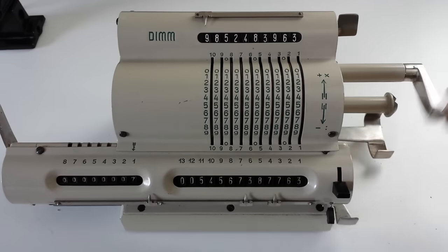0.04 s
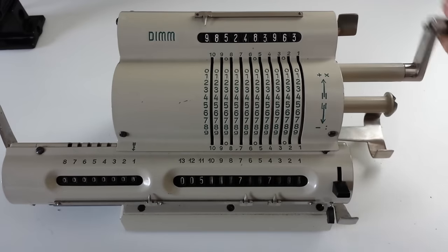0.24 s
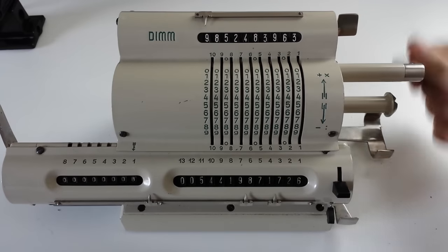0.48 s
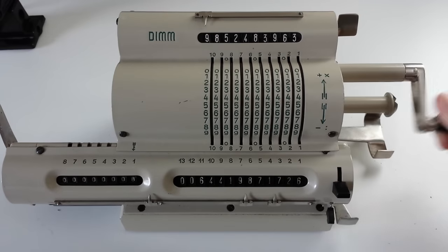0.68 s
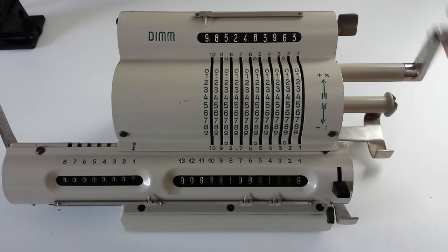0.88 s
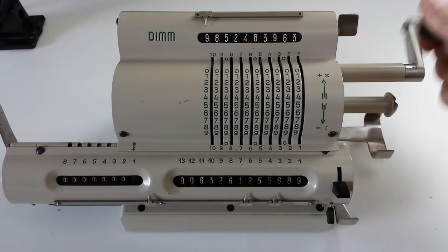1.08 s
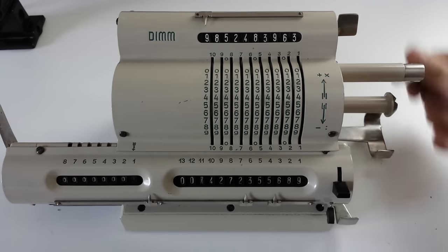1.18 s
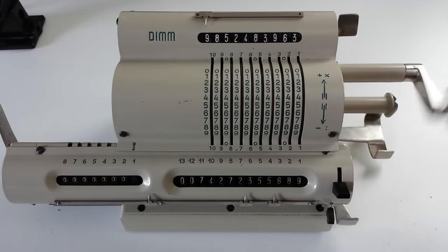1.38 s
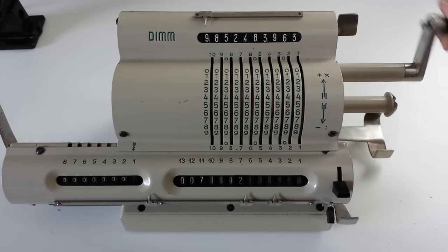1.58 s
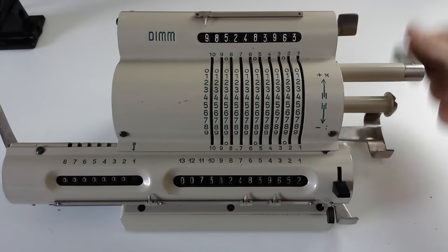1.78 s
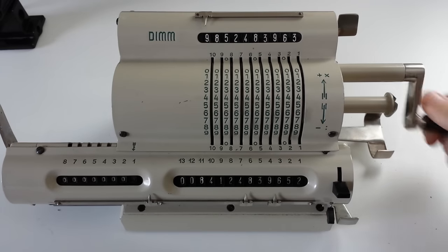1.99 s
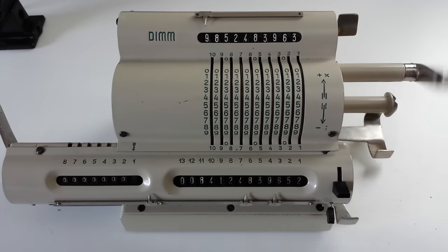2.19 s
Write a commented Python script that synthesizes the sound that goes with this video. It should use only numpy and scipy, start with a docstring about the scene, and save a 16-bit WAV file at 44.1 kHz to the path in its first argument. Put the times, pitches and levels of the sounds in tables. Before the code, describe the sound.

A hand-cranked mechanical calculator turned three times, each a dense bright clatter of gears and snapping levers

```python
"""In a small room, a hand-cranked mechanical calculator is turned three times on a desk, heard from just above.
The last ringing of an earlier turn opens the scene. In each turn the crank leaves its rest, pins drive the
number wheels in a dense clatter, then carry levers and pawls snap one by one. Short noise bursts make steel
parts ring brightly; blows and gear noise make the casing knock and rumble; rubbing noise is the sliding shaft."""
import sys
import numpy as np
from scipy import signal
from scipy.fft import rfft, irfft
from scipy.io import wavfile
from scipy.ndimage import map_coordinates

SR = 44100
rng = np.random.default_rng(int(sys.argv[2]) if len(sys.argv) > 2 else 0)


def generate_wav(signal):
    """Clip the signal to [-1, 1] and save it as 16-bit WAV at the path in sys.argv[1]."""
    frames = np.transpose(np.atleast_2d(signal))
    scaled = np.clip(frames, -1, 1) * 32767
    pcm = np.round(scaled).astype(np.int16)
    wavfile.write(sys.argv[1], SR, pcm)


N = 99225
LEAD = int(.5 * SR)  # start half a second early, so that the earlier turn can ring on
TIME = np.arange(-LEAD, N) / SR  # seconds; the audible part starts at 0

# turns of the crank: leaves_rest_s, wheels_engage_s, wheels_let_go_s, turn_ends_s,
# tooth_click_db, gear_rumble_db, shaft_slides_s, shaft_slide_db
CRANK_TURNS = [(-.45, -0.401, -.22, -.015, -17.5, -43.5, .04, -46),
               (0.216, 0.276, 0.45, 0.66, -11.5, -35, 0.73, -44.5),
               (0.881, 0.945, 1.15, 1.34, -12.5, -37, 1.385, -45),
               (1.54, 1.599, 1.776, 2.001, -12.5, -38, 2.075, -48)]

RISE_S = 0.00091  # how fast a contact and its partials swell up


def undb(db):
    """Turn decibels into a gain."""
    return 10 ** (np.asarray(db) / 20)


def unit(response):
    """Scale a response to an energy of 1."""
    return response / np.sqrt(np.sum(response ** 2, axis=-1, keepdims=True))


def through(x, response):
    """Pass a sound through an object, given that object's answer to a single tap."""
    answer = signal.fftconvolve(np.atleast_2d(x), np.atleast_2d(response), axes=-1)
    return answer[:, :len(TIME)]


def causal(gain):
    """Give a gain spectrum the phase of a filter that rings only after the blow."""
    cepstrum = irfft(np.log(gain + 1e-9))
    half = cepstrum.shape[-1] // 2
    # fold the part before time zero onto the part after it
    cepstrum[..., 1:half] *= 2
    cepstrum[..., half + 1:] = 0
    return np.exp(rfft(cepstrum))


def colour(points, column=1, size=4096):
    """Make a filter of unit energy whose spectrum joins points of pitch and level."""
    p = np.array(points, float)
    hz = np.fft.rfftfreq(size, 1 / SR)
    db = np.interp(np.log(hz + 1), np.log(p[:, 0]), p[:, column])
    return unit(irfft(causal(undb(db))))


def ring(modes):
    """Add up the dying tones of a struck object; t60 is the time to fall by 60 dB."""
    t = np.arange(SR // 2) / SR
    total = 0
    for hz, db, t60 in modes:
        tone = np.cos(2 * np.pi * hz * t) * np.exp(-np.log(1000) * t / t60)
        total = total + undb(db) * unit(tone)
    return total


def noise(side_db):
    """Make stereo noise with an rms of 1, wider as side_db nears 0."""
    mid, side = rng.standard_normal((2, len(TIME)))
    opposite = np.array([[1], [-1]])
    return (mid + undb(side_db) * side * opposite) / np.hypot(1, undb(side_db))


def walk(rate):
    """Waver at random, with a spread near 1 and `rate` new values a second."""
    knots = np.arange(TIME[0], TIME[-1], 1 / rate)
    return np.interp(TIME, knots, rng.standard_normal(len(knots)))


def sample_at(times):
    """Find the sample numbers of moments given in seconds, kept within the scene."""
    return np.clip((times * SR).astype(int) + LEAD, 0, len(TIME) - 1)


def driven(t):
    """Tell when the pins drive the number wheels: 1 while they do, else 0."""
    return sum(1. * ((t > start) & (t < stop)) for _, start, stop, *_ in CRANK_TURNS)


def background():
    """Low room noise from filtered noise, with a faint hum that wavers in level and phase."""
    # still air of the room: pitch_hz, level_db
    air_colour = [(25, -13), (70, -11.5), (128, 9), (230, -3.5), (390, 4), (550, -8.5), (900, -4.5),
                  (1500, -17), (5500, -27), (10000, -30.5), (15000, -49)]
    air_db, air_side_db, hum_hz, hum_db = -58.5, -13.5, 186.6, -59.5
    hum_level = undb(hum_db + 2 * walk(2.2))
    hum = hum_level * np.sin(2 * np.pi * hum_hz * TIME + walk(7.8))
    return undb(air_db) * through(noise(air_side_db), colour(air_colour)) + hum


def room(x):
    """Echoes blur into dying noise, band by band; the highest treble dies first."""
    # reverberation: band_low_hz, band_high_hz, t60_s, level_db
    echo_bands = [(80, 1700, 0.32, -18), (580, 2860, 0.61, -9.5), (3200, 6200, 0.57, -12.5),
                  (7500, 10600, .33, -17.5), (10500, 11000, 0.077, -29.5)]
    delay_s, build_s = 0.014, 0.004
    t = np.arange(SR // 2) / SR
    build = np.clip((t - delay_s) / build_s, 0, 1)
    tail = 0
    for lo_hz, hi_hz, t60, db in echo_bands:
        band = signal.butter(2, [lo_hz, min(hi_hz, SR / 2 - 1)], "band", fs=SR, output="sos")
        fade = np.exp(-np.log(1000) * t / t60)
        echoes = unit(rng.standard_normal((2, len(t))) * build * fade)
        tail = tail + undb(db) * signal.sosfilt(band, echoes)
    return through(x, tail)


def shaft():
    """Rubbing noise makes a soft, ringing scrape as the crank swings through the free part of each turn."""
    # the shaft sliding in its bearings: pitch_hz, level_db
    scrape_colour = [(200, 0.5), (730, 0.5), (1300, 1), (2500, 1), (3100, -3), (4000, 0), (4700, -5),
                     (5700, 1.5), (8000, -8), (14000, -24)]
    # resonances that the sliding shaft rubs into ringing: pitch_hz, level_db, t60_s
    rubbed_tones = [(1730, -14, .12), (2225, -14, 0.099), (3190, -14, .11), (3775, -10.5, 0.056),
                    (3914, -8, 0.087), (4110, -6.5, .06), (5530, -13, .06)]
    width_s, rough_db = 0.02, 3
    idle_db, coast_s = -63.5, 0.2  # faint rubbing until the crank reaches its rest again
    swell = 0
    for *_, end, _, _, when, db in CRANK_TURNS:
        slide = undb(db) * np.exp(-.5 * ((TIME - when) / width_s) ** 2)
        coast = undb(idle_db) * (TIME > end) / (1 + ((TIME - end) / coast_s) ** 10)
        swell = swell + slide + coast
    rub = swell * undb(rough_db * walk(73)) * noise(-1)
    return undb(-3) * through(rub, colour(scrape_colour)) + through(rub, ring(rubbed_tones))


def gears():
    """Energy of the gear train, grinding unevenly from the latch to the end of each turn."""
    attack_s, release_s, rough_db = 0.029, 0.016, 4
    load = 0
    for start, _, _, end, _, db, *_ in CRANK_TURNS:
        rise = np.clip((TIME - start) / attack_s, 0, 1)
        fall = np.exp(-np.maximum(TIME - end, 0) / release_s)
        load = load + undb(db) * rise * fall
    return (load * undb(rough_db * walk(140))) ** 2


def bursts(times, db, decays):
    """Energy of contacts that rise quickly and die away; decays are (time constant s, dB)."""
    hits, t = np.zeros(len(TIME)), np.arange(SR // 4) / SR
    np.add.at(hits, sample_at(times), undb(db) ** 2)
    fall = sum(undb(decay_db) ** 2 * np.exp(-t / decay_s) for decay_s, decay_db in decays)
    return np.abs(through(hits, (1 - np.exp(-t / RISE_S)) * fall)[0])


def steel(energy):
    """Small steel parts: a bright crack of noise that differs at each ear, and a thin ring."""
    # colour of the steel clicks: pitch_hz, left_db, right_db
    click_colour = [(300, -42, -44.5), (2050, -35.5, -44.5), (2880, -18.5, -47.5), (3720, -11, -12),
                    (4260, -9.5, -16), (5554, -1.5, -12), (6800, 1, -8.5), (7220, -2.5, -5.5), (8060, 0, 2),
                    (8680, -19.5, -1.5), (9260, -10.5, -4.5), (12140, -10.5, -9.5), (14550, -13, -13),
                    (15000, -39.5, -39)]
    # ring of wheels and springs: pitch_hz, level_db, t60_s
    steel_tones = [(3720, -28.5, .1), (4600, -27.5, 0.11), (5440, -27, 0.2), (5840, -24, .17),
                   (6090, -26, 0.17), (6567, -23, .17), (6770, -21.5, .15), (7460, -23.5, 0.13),
                   (7830, -19, .13), (8470, -20, 0.17), (9040, -22.5, 0.15), (9400, -25, .14),
                   (10370, -25.5, .12), (10867, -25, .12)]
    crack = np.sqrt(energy) * noise(0)
    ears = [colour(click_colour, 1), colour(click_colour, 2)]
    return through(crack, ears) + through(crack, ring(steel_tones))


def partials(times, click_db, count=3):
    """Each struck part rings briefly at random pitches of its own, differently at each ear."""
    # groups of partials: lowest_hz, highest_hz, t60_s, level_db (against the click)
    pitch_ranges = [(1601.4, 5500, 0.058, -15), (4507, 9500, 0.11, -10.5), (6600, 13000, 0.06, -12.5)]
    out, t = np.zeros((2, len(TIME) + SR)), np.arange(SR // 8) / SR
    rise = 1 - np.exp(-t / RISE_S)
    for when, db in zip(times, click_db):
        at = max(int(when * SR) + LEAD, 0)
        for lo_hz, hi_hz, t60, ring_db in pitch_ranges:
            pitch, left, right = rng.random((3, count, 1))
            hz = lo_hz * (hi_hz / lo_hz) ** pitch
            phase = np.array([left, right])  # where in its swing each tone starts
            waves = np.sin(2 * np.pi * (hz * t + phase)).sum(axis=1) / np.sqrt(count)
            fade = np.exp(-np.log(1000) * t / t60)
            out[:, at:at + len(t)] += undb(db + ring_db) * waves * rise * fade
    return out[:, :len(TIME)]


def push(energy):
    """Noisy force on the casing: its lows reach both ears nearly alike, its highs spread more."""
    split_hz, low_side_db, high_side_db = 502, -13.5, -8.5
    low = signal.butter(2, split_hz, "low", fs=SR, output="sos")
    high = signal.butter(2, split_hz, "high", fs=SR, output="sos")
    force = np.sqrt(energy)
    return signal.sosfilt(low, force * noise(low_side_db)) + signal.sosfilt(high, force * noise(high_side_db))


def blows(times, db):
    """One sharp push or pull for each contact, a little different at each ear."""
    blow_db, ear_spread = 21, 0.42
    way, lean = rng.standard_normal((len(times), 2)).T
    out, at = np.zeros((2, len(TIME))), sample_at(times)
    for ear, side in zip(out, (1, -1)):
        np.add.at(ear, at, undb(db + blow_db) * (np.sign(way) + side * ear_spread * lean))
    return out


def casing(times, knock_db, grind):
    """The casing thuds and rings under the blows, and drums on the desk while the wheels are driven."""
    # dull thud of the casing: pitch_hz, level_db
    thud_colour = [(60, -15), (100, -8.5), (145, 5.5), (230, -5.5), (400, 4), (550, -5), (760, 6),
                   (1130, -2.5), (1400, -6.5), (1720, 4), (2030, -11.5), (2300, 5.5), (2600, 1.5),
                   (2930, -12.5), (3150, 5.5), (3380, -1.5), (3700, 4), (8000, -20.5)]
    # ring of casing and frame: pitch_hz, level_db, t60_s
    case_tones = [(167.4, -16.5, 0.051), (277.3, -18.5, 0.22), (397, -13, 0.043), (459, -21, 0.11),
                  (732, -12, 0.22), (800, -25, 0.045), (924, -16, 0.2), (976.3, -18.5, 0.3),
                  (1111, -18.5, 0.06), (1711, -13.5, 0.077), (1778, -18.5, 0.1), (2223, -20.5, 0.1),
                  (2480, -14, 0.037), (2620, -22.5, 0.084)]
    # low resonances of the machine on the desk: pitch_hz, level_db, t60_s
    desk_tones = [(140.4, -7.5, 0.15), (161.3, -7, 0.15), (358, -15.5, 0.17)]
    knock_s, thud_db, desk_db, low_cut_hz = 0.0038, -3.5, -46, 88
    knocks = bursts(times, knock_db, [(knock_s, 0)])
    thud = through(push(knocks + grind), colour(thud_colour))
    ringing = through(blows(times, knock_db) + push(grind), ring(case_tones))
    drumming = through(push(driven(TIME)), ring(desk_tones))
    body = ringing + undb(thud_db) * thud + undb(desk_db) * drumming
    return signal.sosfilt(signal.butter(4, low_cut_hz, "high", fs=SR, output="sos"), body)


def wheel_teeth(count=80):
    """Pins push the number wheels on tooth by tooth: rows of (s, click dB, knock dB)."""
    teeth_per_s, jitter, scatter_db = 185, .25, 1  # jitter: share of the gap between teeth
    # sag: change from the first tooth to the last
    click_sag_db, knock_db, knock_sag_db = -1, -13, -9.5
    rows = []
    for _, start, stop, _, db, *_ in CRANK_TURNS:
        late, size = rng.standard_normal((count, 2)).T
        t = start + (np.arange(count) + jitter * late) / teeth_per_s
        along = (t - start) / (stop - start)
        level = db + scatter_db * size
        teeth = np.c_[t, level + click_sag_db * along, level + knock_db + knock_sag_db * along]
        rows.append(teeth[t < stop])
    return np.vstack(rows)


def shifting(x, size=2048):
    """Narrow bands swell a little and now and then sink deeply; the dense clatter sounds hollow and lean."""
    # bands that sound hollow while the wheels are driven: pitch_hz, width_hz, level_db
    hollow_bands = [(55, 35, -6), (235, 30, -5), (545, 45, -14), (1400, 130, -3), (2015, 40, -10),
                    (2950, 70, -3), (3440, 40, -5)]
    # the depth doubles while the wheels are driven and shrinks towards the treble
    depth_db, width_hz, changes_per_s, top_hz = 2, 95, 11, 6500
    hz, t, bands = signal.stft(x, SR, nperseg=size)
    load = driven(t + TIME[0])
    # a random landscape over pitch and time
    chance = rng.standard_normal((size // 4, size // 4))
    places = np.meshgrid(hz / width_hz, t * changes_per_s, indexing="ij")
    field = map_coordinates(chance, places, order=1)
    depth = np.outer(depth_db / (1 + (hz / top_hz) ** 2), 1 + load)
    hollow = sum(db * np.exp(-.5 * ((hz - centre) / width) ** 2) for centre, width, db in hollow_bands)
    gain = undb(depth * (1 - np.exp(-field)) + np.outer(hollow, load))
    return signal.istft(bands * causal(gain.T).T, SR, nperseg=size)[1][:, :len(TIME)]


def scene():
    """Snaps, teeth and gears shake steel and casing; the room answers."""
    # single snaps of latch, pawls and carry levers: start_s, steel_click_db, casing_knock_db
    snaps = np.array([(-.045, -30, -27), (-.025, -20, -32), (.222, -20.5, -30), (.239, -13, -32),
                      (0.256, -15, -24.5), (0.264, -10, -28), (0.286, -30, -37), (.3075, -21, -44),
                      (.378, -13, -30), (.401, -16, -27.5), (.429, -7.5, -24), (.459, -13.5, -34),
                      (0.478, -13, -40), (0.4943, -13, -35), (.511, -12, -29), (0.524, -13.5, -50),
                      (0.5525, -17.5, -21.5), (0.567, -13.5, -54), (0.584, -16, -44),
                      (0.6084, -14.5, -28.5), (0.6253, -16, -53), (.643, -14, -27.5), (.649, -20, -38),
                      (0.8948, -22, -28), (.910, -13, -26), (0.9272, -13.5, -24.5), (0.934, -11.5, -23.5),
                      (0.954, -15, -29), (0.993, -10.5, -21), (1.01, -10.5, -18.5), (1.028, -10, -28.5),
                      (1.046, -10.5, -35), (1.0751, -9, -31), (1.110, -12, -26), (1.1775, -13, -46),
                      (1.2076, -14, -23), (1.221, -11.5, -58), (1.239, -18, -49), (1.2519, -19.5, -24),
                      (1.265, -15, -39), (1.289, -12.5, -32.5), (1.308, -24, -49), (1.320, -16.5, -24.5),
                      (1.325, -14.5, -32.5), (1.5245, -43, -44), (1.551, -22, -27), (1.568, -14, -28),
                      (1.585, -13.5, -28), (1.593, -14, -20.5), (1.626, -22, -21.5), (1.703, -27, -24),
                      (1.73, -19, -23), (1.782, -14.5, -27), (1.802, -14, -48), (1.817, -16.5, -43),
                      (1.835, -25, -39), (1.847, -15.5, -28), (1.876, -24.5, -36), (1.8926, -17.5, -56),
                      (1.914, -18.5, -47), (1.945, -16.5, -56), (1.9629, -18, -42), (1.979, -20, -29),
                      (1.986, -18, -27)])
    times, click_db, knock_db = np.vstack([snaps, wheel_teeth()]).T
    grind = gears()
    # each click dies away, with a fainter chatter after it (time constant s, dB)
    clicks = bursts(times, click_db, [(0.0027, 0), (0.014, -15.5)])
    # the first instant of a snap is sharper
    clicks = clicks + bursts(snaps[:, 0], snaps[:, 1], [(0.0007, 3.5)])
    clicks = clicks + undb(-8.5) ** 2 * grind
    # the steel parts sit towards the crank, on the right
    left_minus_right_db = -2.5
    lean = undb(np.array([[1], [-1]]) * left_minus_right_db / 2)
    bright = lean * (steel(clicks) + partials(times, click_db))
    machine = bright + casing(times, knock_db, grind) + shaft()
    return (shifting(machine + room(machine)) + background())[:, LEAD:]


def record(dry):
    """Gain control turns down the loud clatter by its recent power; peaks are rounded and the top is cut."""
    knee_db, squeeze, react_s, makeup_db = -17.5, 0.45, 0.064, 1  # squeeze: dB cut per dB far above the knee
    ceiling, top_hz = .95, 15500
    keep = np.exp(-1 / (react_s * SR))
    power = signal.lfilter([1 - keep], [1, -keep], np.mean(dry ** 2, axis=0))
    gain = undb(makeup_db) * (1 + power / undb(knee_db) ** 2) ** (-squeeze / 2)
    loud = dry * gain
    rounded = loud / np.sqrt(np.hypot(1, (loud / ceiling) ** 2))
    return signal.sosfilt(signal.ellip(8, .2, 70, top_hz, fs=SR, output="sos"), rounded)


dry = scene()
out = record(dry)
generate_wav(out)
```